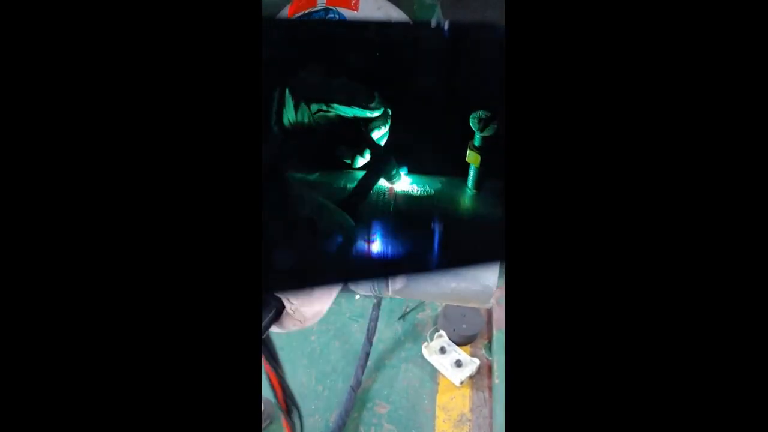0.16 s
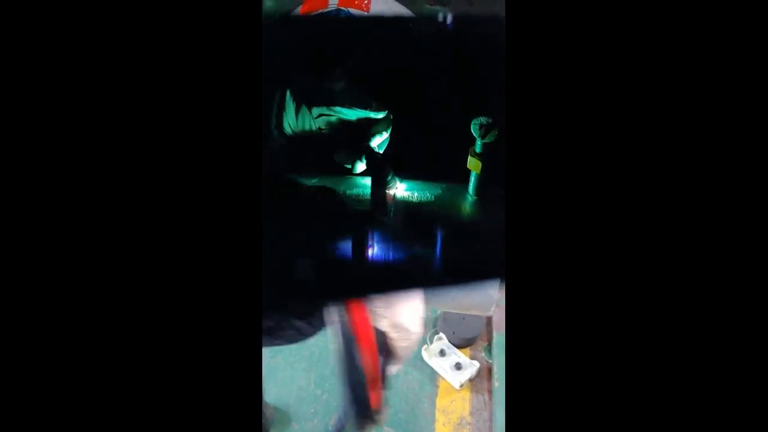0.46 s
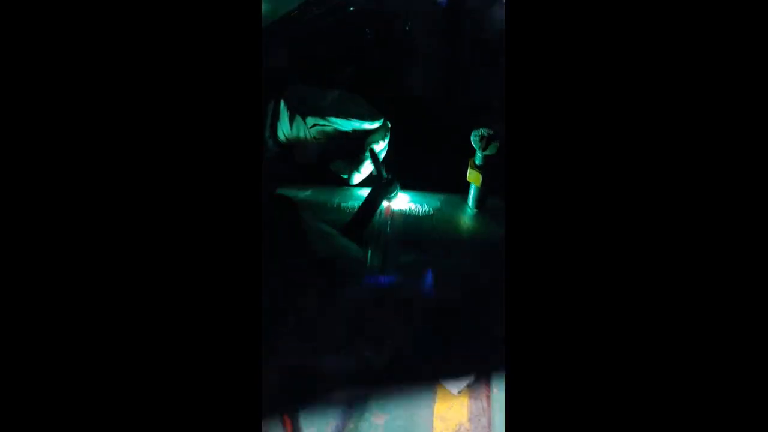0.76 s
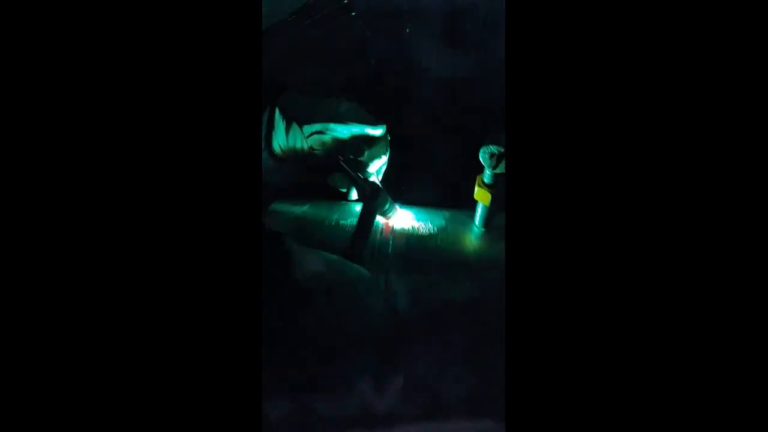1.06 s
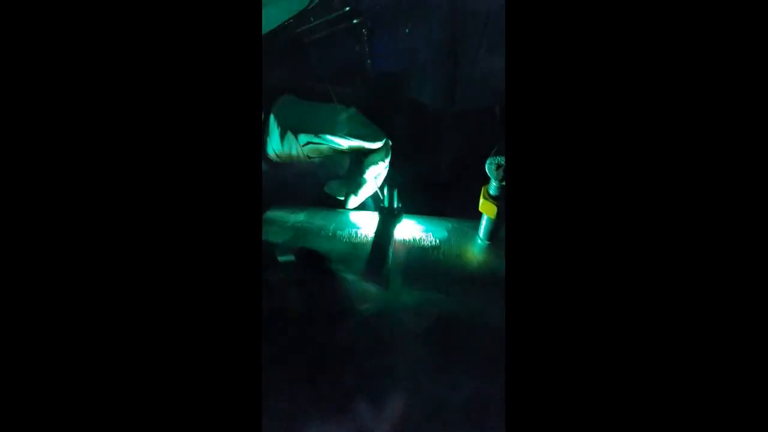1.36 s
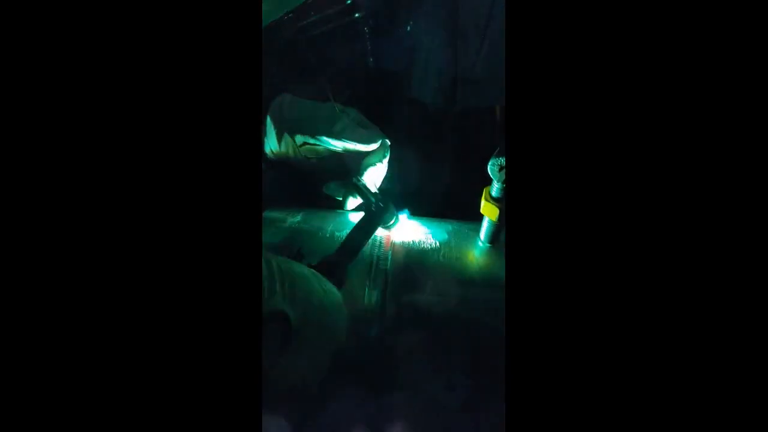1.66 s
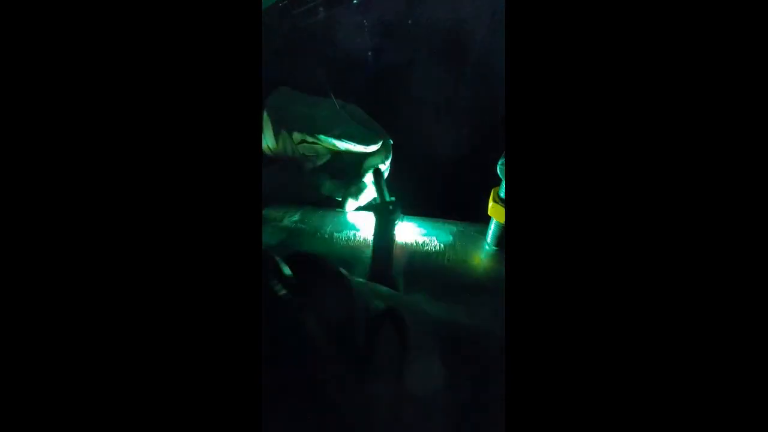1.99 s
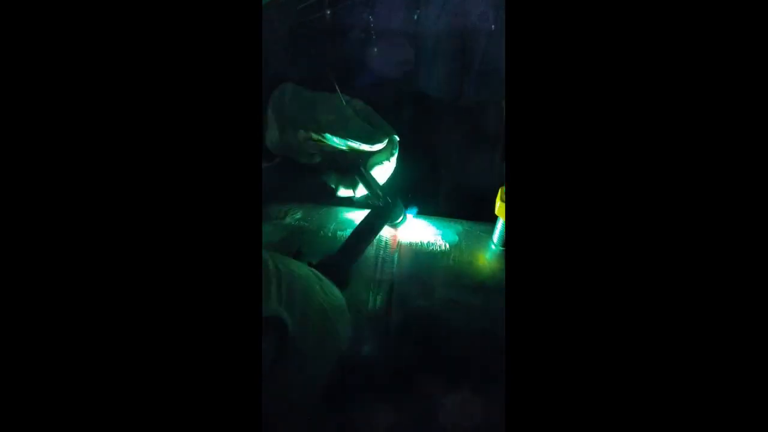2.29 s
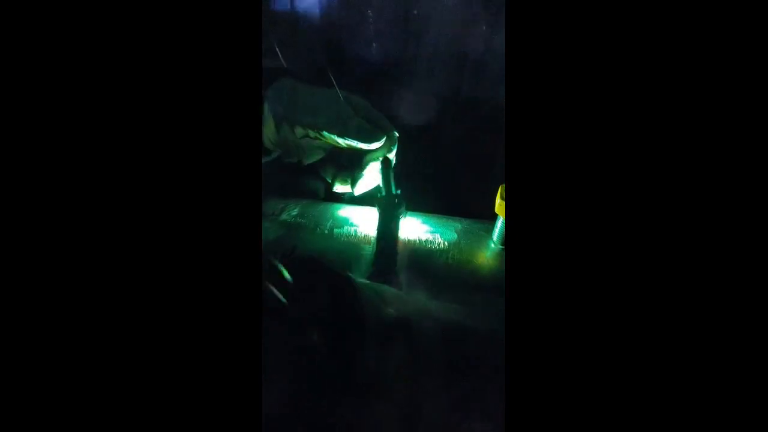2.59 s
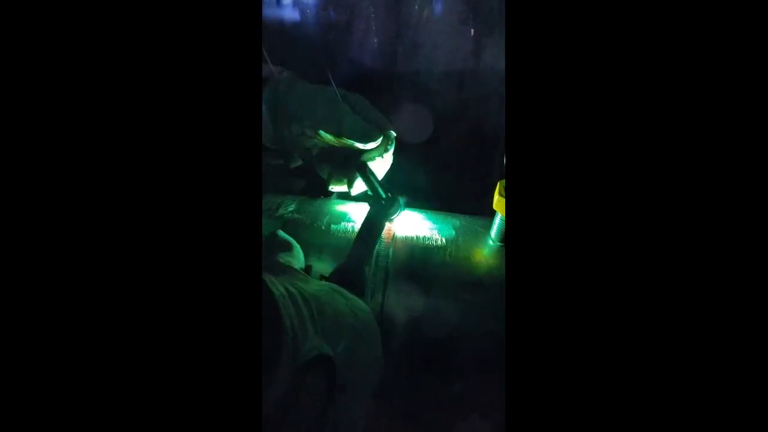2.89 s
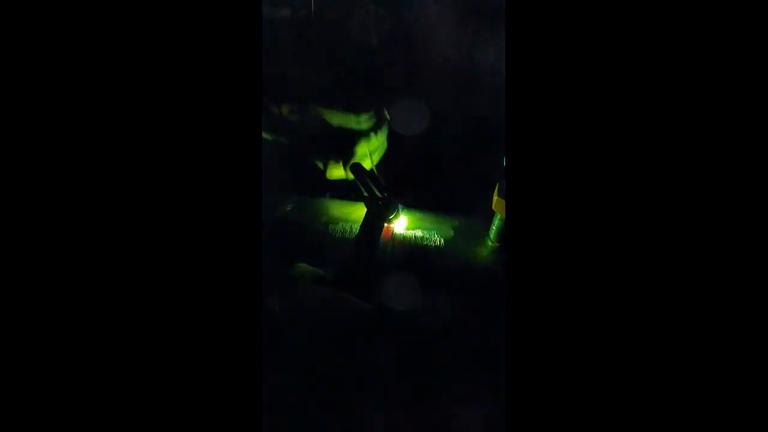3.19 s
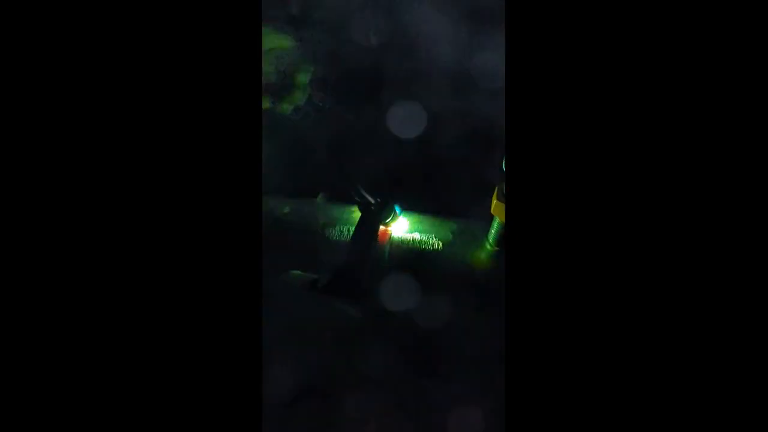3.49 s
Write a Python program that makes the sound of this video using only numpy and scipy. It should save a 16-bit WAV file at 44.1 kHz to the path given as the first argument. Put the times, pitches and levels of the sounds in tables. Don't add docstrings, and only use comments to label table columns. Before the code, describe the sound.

A welding arc on metal pipe buzzes from start to finish, about 57 paired sharp clicks a second, each spitting a short noise burst. Heard inside a mask, it rings hollow and boomy, with small level shifts and a harder snap near 1.9 s. Gas hisses; fans and workshop noise murmur beneath. At about 3.2 s the boom drops abruptly, leaving drier, raspier clicks and clearer hiss until the cut-off around 3.7 s.

```python
import sys
import numpy as np
from scipy import signal
from scipy.fft import rfft, irfft, next_fast_len
from scipy.io import wavfile
from scipy.ndimage import uniform_filter1d, map_coordinates

SR = 44100
rng = np.random.default_rng(int(sys.argv[2]) if len(sys.argv) > 2 else 0)


def transcribe(signal):
    frames = np.atleast_2d(signal).T
    limited = np.clip(frames, -1, 1)
    pcm = np.round(limited * 32767).astype(np.int16)
    wavfile.write(sys.argv[1], SR, pcm)


def ratio_of_db(decibels):
    return 10 ** (np.asarray(decibels, float) / 20)


N = 160965

# start_s, level_db (arc), boom_db (mask), sizzle_db (cup and gas)
ARC_COURSE = [(0.0, -27, 6, -2), (0.14, -26, 7.5, -5.5), (1.55, -24.5, 6.5, -5), (1.88, -22.5, 4.5, -1),
              (2.02, -26, 8, -4), (2.31, -22, 4.5, -1), (2.57, -24, 4.5, -2.5), (3.14, -23, 5.5, -5),
              (3.22, -24, 0, -7.5), (3.6, -23.5, 0, -9), (3.64, -27, 0, -13), (3.65, -23.5, 0, -6)]


def unit(x):
    return x / np.sqrt(np.mean(x ** 2) + 1e-20)


def along(points, hz):
    f, v = np.transpose(points)
    return np.interp(np.log(hz + 1), np.log(f + 1), v)


def curves(rows):
    s, *columns = np.transpose(rows)
    t = np.arange(N) / SR
    return [np.interp(t, s, column) for column in columns]


def wobble(rate_hz):
    return map_coordinates(rng.standard_normal(200), [np.arange(N) * rate_hz / SR])


def filtered(x, response):
    size = next_fast_len(N + SR // 2)
    hz = np.fft.rfftfreq(size, 1 / SR)
    return irfft(rfft(x, size) * response(hz), size)[..., :N]


def band(hz, width_hz):
    return lambda f: 1j * f * width_hz / (hz * hz - f * f + 1j * f * width_hz)


def rush(spectrum, alike, patchy_db):
    z = signal.stft(rng.standard_normal((2, N)), nperseg=512)[2]
    patches = uniform_filter1d(rng.standard_normal(z.shape[1:]), size=6, axis=0)
    patches = uniform_filter1d(patches, size=14, axis=1)
    pair = signal.istft(z * ratio_of_db(patchy_db * unit(patches)), nperseg=512)[1][:, :N]

    def colour(hz):
        angle = np.arccos(np.clip(along(alike, hz), -1, 1)) / 2
        return ratio_of_db(along(spectrum + [(22000, -78)], hz)) * [np.cos(angle), np.sin(angle)]

    mid, side = filtered(pair, colour)
    return unit(np.array([mid + side, mid - side]))


def pulses(times, sizes):
    at = times[:, None] * SR
    index = np.floor(at).astype(int) + np.arange(-8, 9)
    shape = sizes[:, None] * np.sinc(index - at) * np.cos((index - at) * np.pi / 18) ** 2
    return np.bincount(index.clip(0, N).ravel(), shape.ravel(), N + 1)[:N]


def arc():
    level_db = curves(ARC_COURSE)[0]
    clicks, gate = reversals()
    return ratio_of_db(level_db) * (ratio_of_db(47.5) * mask_tone(clicks) + ratio_of_db(15) * spit(gate))


def reversals():
    # start_s, delay_ms
    path_change = [(0, 0.058), (.7, 0.077), (1.35, -0.314), (2.5, -0.079), (3.1, -0.116), (3.5, 0.06)]
    # start_s, extra_db
    pops = [
        (1.883, 4),
    ]
    cycle_hz, first_s, reversal_s = 56.728, .01465, .00172
    edge_db, edge_scatter_db, jitter_s = (-2, 0), (2, 0), (.00004, .00002)
    spit_db, spit_t60_s, spit_scatter_db = (3, -1.5), (.013, .018), 2.5

    start = first_s + np.arange(-1, int(N / SR * cycle_hz) + 1) / cycle_hz
    start = start + np.interp(start, *np.transpose(path_change)) / 1000
    extra_db = sum(db * (abs(start - s) < .5 / cycle_hz) for s, db in pops)
    clicks, gate = np.zeros(N), np.zeros(N)
    t = np.arange(SR // 50) / SR
    for k in range(2):
        chance = rng.standard_normal((len(start), 3))
        times = start + k * reversal_s + jitter_s[k] * chance[:, 0]
        clicks += pulses(times, ratio_of_db(edge_db[k] + edge_scatter_db[k] * chance[:, 1]))
        burst_db = spit_db[k] + spit_scatter_db * chance[:, 2] + extra_db * (k == 0)
        gate += signal.fftconvolve(pulses(times, ratio_of_db(burst_db)), ratio_of_db(-60 * t / spit_t60_s[k]))[:N]
    return clicks, gate


def mask_tone(clicks):
    # pitch_hz, width_hz, left_db, right_db
    closed = [(595, 321, -5, -1.5), (824, 219, -1, -0.5), (1700, 760, -13.5, -12.5), (1940, 160, 2, -12),
              (2253, 330, 0.5, -7.5), (2815, 172, -10.5, -9), (3380, 350, -10.5, -13),
              (4180, 330, -14, -44), (5400, 590, -20, -48), (6900, 490, -26, -47), (360, 330, 2, -13)]
    # pitch_hz, width_hz, left_db, right_db
    tilted = [(586, 193, -2.5, -1.5), (995, 760, -4.5, -4.5), (1490, 240, -4, -2.5), (1900, 180, -3, -23),
              (2430, 290, -3, -29), (2920, 380, -19, -4.5), (3850, 490, -14, -10), (5600, 810, -15, -21),
              (7260, 1600, -30, -35), (342, 380, -6, -3)]
    # pitch_hz, width_hz, left_db, right_db
    cup = [(9670, 680, -14, -16), (10100, 280, -38, -22)]
    right_lag_s = .0001

    _, boom_db, sizzle_db = curves(ARC_COURSE)
    tilt = opening()
    tone = ring(clicks * (1 - tilt), closed, ratio_of_db(boom_db))
    tone -= ring(clicks * tilt, tilted)
    tone += ratio_of_db(2 * sizzle_db) * ring(clicks, cup)
    tone[1] = filtered(tone[1], lambda f: np.exp(-2j * np.pi * f * right_lag_s))
    return tone


def ring(x, modes, boom=1):
    drift_db, drift_hz = 1, 3.86
    out = np.zeros((2, N))
    for k, (hz, width_hz, *ears_db) in enumerate(modes):
        drift = ratio_of_db(drift_db * np.array([wobble(drift_hz), wobble(drift_hz)]))
        mode = filtered(x, lambda f: band(hz, width_hz)(f) ** 2)
        out += (-1) ** k * ratio_of_db(ears_db)[:, None] * drift * mode * (boom if k < 2 else 1)
    return out


def opening():
    tilt_s, tilt_length_s = 3.175, .017
    return np.clip((np.arange(N) / SR - tilt_s) / tilt_length_s + .5, 0, 1)


def spit(gate):
    # pitch_hz, level_db
    spit_spectrum = [(500, -5), (1200, -13.5), (2200, -0.5), (3500, -9.5), (6000, -11), (8500, -17),
                     (10300, -11), (15500, -24.5)]
    alike = [(1000, 1.0), (4000, 0.2), (12000, 0.081)]  # Hz, likeness of the ears
    noise = rush([(50, 0), (17000, 0)], alike, patchy_db=2) * gate * ratio_of_db(3.5 * opening())
    return filtered(noise, lambda f: ratio_of_db(along(spit_spectrum, f)))


def surroundings(x):
    # delay_s, level_db
    echoes = [(.0031, -22.5), (.0047, -18), (.0063, -19.5), (.0095, -42.5), (.0128, -29)]
    # pitch_hz, t60_s
    room_decay = [(300, 0.14), (2000, 0.26), (10000, 0.076)]

    def reflect(f):
        paths = sum(ratio_of_db(db) * np.exp(-2j * np.pi * f * s) for s, db in echoes)
        return 1 + paths * band(700, 1500)(f)

    near = filtered(x, reflect)
    hz, t, z = signal.stft(rng.standard_normal((2, SR // 3)), SR, nperseg=256)
    decay = ratio_of_db(-60 * t / along(room_decay, hz)[:, None])
    tail = signal.istft(z * decay, SR, nperseg=256)[1]
    tail = tail / np.linalg.norm(tail[0])
    late = np.pad(x, ((0, 0), (300, 0)))
    wet = signal.fftconvolve(late, tail, axes=1)[:, :N]
    return near + ratio_of_db(-9) * wet


def gas():
    # pitch_hz, level_db
    hiss_spectrum = [(2500, -16), (4500, -6.5), (7000, -2.5), (8800, -0.5), (9900, 2.5), (11200, -5.5),
                     (13000, -8), (15900, -6)]
    sizzle_db = curves(ARC_COURSE)[2]
    level_db = -28.5 + sizzle_db + 9 * opening() + 3.0 * wobble(5.8)
    return ratio_of_db(level_db) * rush(hiss_spectrum, [(4000, 0.14)], patchy_db=3)


def shop():
    # pitch_hz, level_db (per Hz)
    shop_spectrum = [(25, -25), (60, -10), (170, -7.5), (350, -0.5), (650, -10), (1200, -8), (2200, -17),
                     (5000, -15.5)]
    # pitch_hz, likeness (0-1)
    shop_likeness = [(30, 0.99), (300, 0.83), (800, 0.24), (2000, 0.58), (6000, 0.038)]
    # pitch_hz, width_hz, level_db
    fan_tones = [(90.3, 11, -45.5), (178.4, 11.2, -35.5), (253.9, 7.8, -37.5), (210.5, 5.5, -39.5)]
    fans = np.zeros(N)
    for hz, width_hz, db in fan_tones:
        tone = filtered(rng.standard_normal(N), lambda f: band(hz, width_hz)(f) ** 2)
        fans += ratio_of_db(db) * unit(tone)
    return ratio_of_db(-26.5 + 1.7 * wobble(3.1)) * rush(shop_spectrum, shop_likeness, patchy_db=1.5) + fans


def scene():
    return surroundings(arc()) + gas() + shop()


def band_limit(x):
    return signal.sosfilt(signal.butter(12, 16880, fs=SR, output="sos"), x)


def record(dry):
    ceiling, knee, top_hz = 1.99, 12.3, 15950
    held = dry / (1 + abs(dry / ceiling) ** knee) ** (1 / knee)
    return band_limit(filtered(held, lambda f: f < top_hz))


dry = scene()
out = record(dry)
transcribe(out)
```